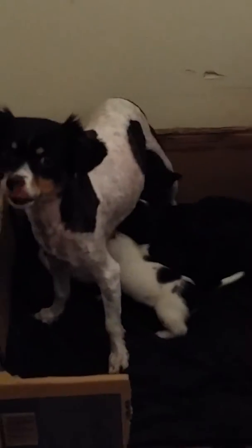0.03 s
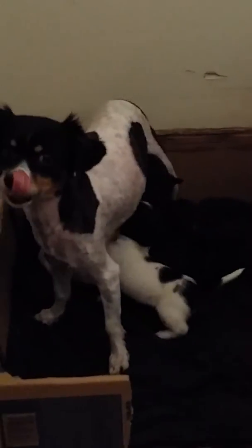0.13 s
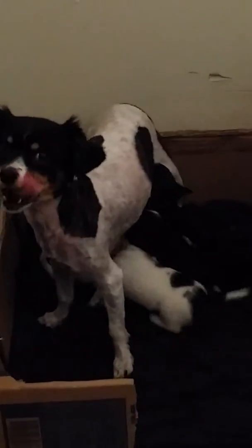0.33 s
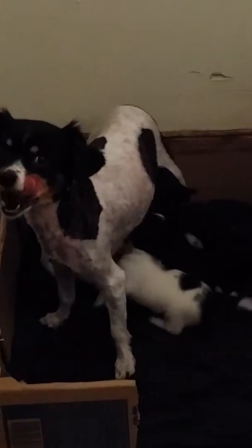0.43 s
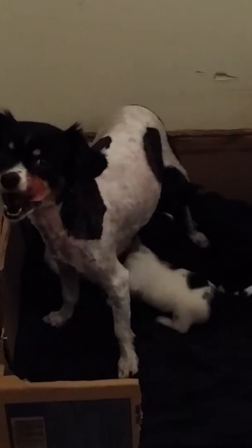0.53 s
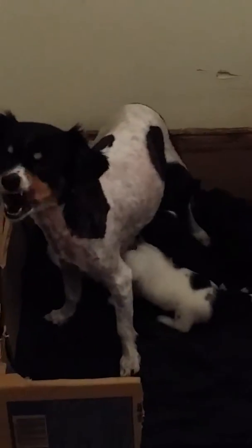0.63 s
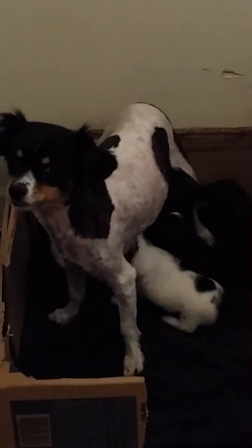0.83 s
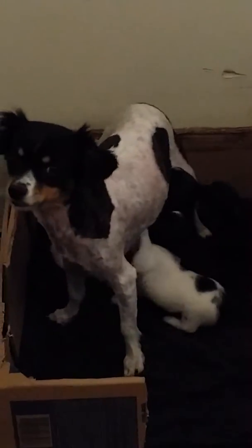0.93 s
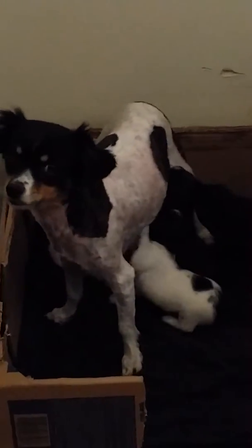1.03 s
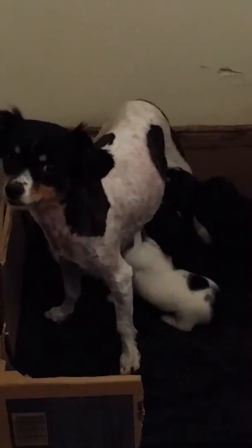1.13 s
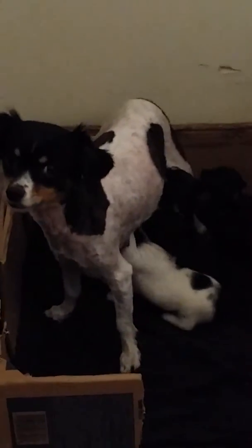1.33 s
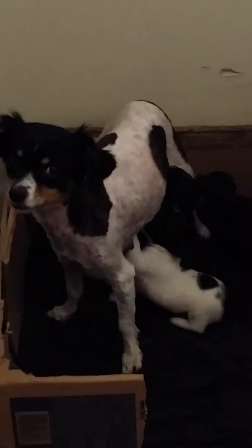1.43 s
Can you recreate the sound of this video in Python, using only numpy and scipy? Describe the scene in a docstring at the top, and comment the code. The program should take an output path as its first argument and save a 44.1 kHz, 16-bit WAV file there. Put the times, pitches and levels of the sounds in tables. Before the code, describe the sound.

A newborn puppy gives one thin, high squeal that holds its pitch, swells, then sags and turns rough. Soft bumps and a bright swish of bedding follow, heard close by in a small quiet room.

```python
"""A newborn puppy gives one thin, high squeal from its bedding in a small quiet room.
The note holds near one pitch, grows fuller as the mouth opens, then sags and turns rough.
The pup flops over with soft bumps and a bright swish of sliding cloth, then snuffles faintly.
The mother's licks tick now and then; a low rustle of bedding lies underneath."""
import sys
import numpy as np
from scipy import signal
from scipy.fft import rfft, irfft, next_fast_len
from scipy.io import wavfile

SR = 44100
rng = np.random.default_rng(int(sys.argv[2]) if len(sys.argv) > 2 else 0)


def file_out(sig):
    """Save sig as 16-bit WAV at sys.argv[1]."""
    # one column per channel
    cols = np.atleast_2d(sig).T
    # limit, then scale
    lim = np.clip(cols, -1, 1)
    pcm = np.round(lim * 32767).astype(np.int16)
    wavfile.write(sys.argv[1], SR, pcm)


N = 66150
T = np.arange(N) / SR
NEAR_PAN_DB, CUTOFF_HZ = -3, 14700

# (time [s], pitch [Hz])
SQUEAL_PITCH = [(.115, 969), (.15, 964), (.19, 963.6), (.225, 985.4), (.27, 980.7), (.32, 965), (.37, 980),
                (.45, 968.3), (.55, 969.5), (.62, 965.7), (.66, 956.4), (.69, 941), (.72, 930)]
# (time [s], level [dB])
SQUEAL_EFFORT = [(.115, -74), (.133, -48), (.185, -46), (.215, -38), (.25, -34), (.285, -36.5),
                 (.318, -34.5), (.35, -31.5), (.385, -36.5), (.43, -32), (.49, -32), (.545, -29),
                 (.605, -31), (.628, -29.5), (.646, -38), (.68, -34), (.705, -41), (.74, -76)]
# (time [s], rms jitter [fraction of pitch])
PITCH_JITTER = [(.12, 0.0027), (.3, 0.0042), (.45, 0.0012), (.62, 0.0011), (.66, .005), (.7, 0.03)]
# (time [s], opening [0 shut, 1 wide])
MOUTH_OPENING = [(.12, 0.8), (.25, 0.004), (.31, 0.26), (.37, 0.46), (.42, 0.59), (.48, 0.8), (.55, 0.91),
                 (.63, 0.9), (.7, 0.76)]
# (harmonic [number], level shut, ajar, half open, wide [dB], L-R shut, wide [dB])
MOUTH_HARMONICS = [(1, 1, -8.5, -4.5, -14.5, 4.5, -3.5), (2, 6, 0.5, 0.5, -5, -10.5, -12),
                   (3, -11.5, -11, -4.5, 3.5, -4.5, -7), (4, -22.5, -17.5, -15, -20.5, 0.5, -9.5),
                   (5, -31, -17.5, -22.5, -6.5, 4, 3), (6, -13.5, -22.5, -19.5, -39.5, 2, 5),
                   (7, -7.5, -6, -19.5, -17, 3, 5), (8, -7.5, -2.5, -10.5, -10.5, -3.5, -4.5),
                   (9, -14.5, -21.5, -17.5, -14, -7, -3.5)]
# (harmonic [number], level [dB])
TOP_HARMONICS = [(10, -28), (11, -29.5), (12, -37.5), (13, -31), (14, -29), (15, -41.5)]
# (time [s], level [dB])
BREATH_LEVEL = [(.11, -69), (.15, -49.5), (.22, -57.5), (.3, -48), (.43, -53.5), (.55, -56.5), (.63, -72),
                (.7, -50), (.74, -68)]
# (frequency [Hz], density [dB])
BREATH_SPECTRUM = [(200, -14), (600, -5.5), (1400, 0.5), (2500, -1.5), (3400, -5.5), (5500, -3.5),
                   (7500, 3), (10000, -7), (14500, -11)]


def squeal():
    """Harmonics of one jittery pitch plus leaking air; the opening mouth favours the third harmonic."""
    jitter_hz, rasp_hz, shimmer_hz, flutter_hz, fray_hz = 82, 300, 21, 16, 57.4
    left_lead_s, top_pan_db = .000035, -5
    jitter = along(PITCH_JITTER, T) * drift(jitter_hz)
    rasp = .0012 * drift(rasp_hz)
    pitch_hz = along(SQUEAL_PITCH, T) * (1 + jitter + rasp)
    phase = 2 * np.pi * (np.cumsum(pitch_hz) / SR + pitch_hz * left_lead_s * np.array([[1], [0]]))
    mouth = along(MOUTH_OPENING, T)
    partials = []
    for _, *levels_db, shut_pan_db, wide_pan_db in MOUTH_HARMONICS:
        level_db = np.interp(mouth, np.linspace(0, 1, len(levels_db)), levels_db)
        partials.append((level_db, shut_pan_db + (wide_pan_db - shut_pan_db) * mouth))
    partials += [(level_db, top_pan_db) for _, level_db in TOP_HARMONICS]
    voice, power = 0, 0
    for k, (level_db, pan_db) in enumerate(partials, 1):
        shimmer_db = (1.5 + 5.2 * (1 - mouth) * (k > 2)) * drift(shimmer_hz)
        flutter_db = 7.5 * k / len(partials) * drift(flutter_hz)
        voice += pan(pan_db) * from_db(level_db + shimmer_db + flutter_db) * np.sin(k * phase)
        power += from_db(level_db) ** 2 / 2
    # The voice frays as it gives out.
    fray_depth_db = np.interp(T, [.62, .68], [0, 3.5])
    fray_db = fray_depth_db * np.cos(2 * np.pi * fray_hz * (T - .68))
    tone = from_db(along(SQUEAL_EFFORT, T) + fray_db) * voice / np.sqrt(power)
    breath = pan(NEAR_PAN_DB) * from_db(along(BREATH_LEVEL, T)) * noise(BREATH_SPECTRUM)
    sounding = (T > SQUEAL_EFFORT[0][0]) * (T < SQUEAL_EFFORT[-1][0])
    return sounding * (tone + breath)


# (peak time [s], rise [s], fall [s], level [dB])
CLOTH_SLIDES = [(.15, .012, .04, -59), (0.774, 0.058, 0.054, -36.5), (1.012, 0.074, 0.055, -57.5),
                (1.141, 0.011, 0.0083, -61), (1.19, 0.022, 0.023, -65.5), (1.5, 0.045, .05, -62)]
# (frequency [Hz], density [dB])
CLOTH_SPECTRUM = [(200, -9), (700, -14), (1200, -18), (2300, -3.5), (3500, -8.5), (5200, -8), (7500, -1.5),
                  (11000, -3), (14500, -6)]


def cloth_swishes():
    """Fibres catch and slip under the pup, giving each slide a finely grained hiss."""
    grain = rms_one(from_db(1.5 * drift(rate_hz=190)))
    slides = sum(swell(*slide) for slide in CLOTH_SLIDES)
    return pan(db=-4) * slides * grain * noise(CLOTH_SPECTRUM)


# (time [s], thud level [dB], puff level [dB], thud frequency [Hz], thud T60 [s])
BODY_BUMPS = [(.077, -59, -51, 314, 0.093), (.111, -72, -48.5, 370, 0.034), (.185, -66, -76, 128, .12),
              (0.291, -48, -53, 226, 0.11), (.704, -44.5, -40, 257, 0.15), (.762, -51, -56, 222.3, 0.22),
              (0.814, -46.5, -50.5, 92.65, .2), (0.927, -58, -63, 242, 0.076),
              (1.119, -55.5, -87, 105, 0.091), (1.234, -63, -72, 113.1, 0.15), (1.413, -58, -75, 96.7, .3),
              (1.479, -65.5, -59, 275, 0.06)]


def bumps():
    """Paws and body hit the bedding: damped low thuds, each with a dull puff from the padding."""
    puff_band = signal.butter(2, [190, 515], "band", fs=SR, output="sos")
    puff_noise = rms_one(signal.sosfilt(puff_band, rng.standard_normal(N)))
    total = np.zeros(N)
    for start_s, thud_db, puff_db, thud_hz, t60_s in BODY_BUMPS:
        ring = np.sqrt(2) * np.sin(2 * np.pi * thud_hz * (T - start_s))
        total += from_db(thud_db) * strike(start_s, attack_s=.0061, t60_s=t60_s) * ring
        total += from_db(puff_db) * strike(start_s, attack_s=.0007, t60_s=.077) * puff_noise
    return total


# (time [s], level [dB])
LICK_TICKS = [(0.077, -53), (0.142, -41.5), (.926, -74), (1.122, -51.5)]
# (frequency [Hz], density [dB])
LICK_SPECTRUM = [(500, -8), (2000, -22), (4000, -3), (7500, 10), (13000, -3.5), (14500, -6)]


def licks():
    """The mother's licking makes short, wet ticks of bright noise."""
    ticks = sum(from_db(db) * strike(start_s, attack_s=.00062, t60_s=.048) for start_s, db in LICK_TICKS)
    return ticks * noise(LICK_SPECTRUM)


# (time [s], level [dB])
SHUFFLE_LEVEL = [(0, -58.5), (.06, -62.5), (.2, -57), (.3, -56.5), (.56, -53), (.65, -57), (.85, -59.5),
                 (1.0, -63), (1.15, -62.5), (1.27, -76.5), (1.5, -65)]
# (frequency [Hz], density [dB])
BEDDING_SPECTRUM = [(30, -16), (110, 0.5), (250, -3.5), (500, -8.5), (1000, -12.5), (3000, -13.5),
                    (8000, -15.5), (14500, -22.5)]


def shuffle():
    """The dogs shift on the bedding with an uneven low rustle."""
    flutter_db = 2 * drift(rate_hz=30)
    return from_db(along(SHUFFLE_LEVEL, T) + flutter_db) * noise(BEDDING_SPECTRUM)


def snuffle():
    """Air through the pup's nose gives a brief breathy whistle of narrow-band noise."""
    centre_hz, width_hz = 1680, 85
    phase = 2 * np.pi * centre_hz * T
    whistle = drift(width_hz) * np.sin(phase) + drift(width_hz) * np.cos(phase)
    return swell(peak_s=1.02, rise_s=.04, fall_s=.035, db=-67) * whistle


# One row per ear, left first: (delay of each wall path [s])
WALL_PATHS_S = [
    [.0171, .0223, .0269, .0317, .0373, .0431],
    [.0187, .0239, .0283, .0337, .0391, .0457],
]
# (all-pass delay [s])
SCATTER_LAGS_S = [.0013, .0029, .0047]


def room_reverb(x, t60_s=.31):
    """Sound circles between the walls on separate paths for each ear, scattering on the way."""
    size = next_fast_len(2 * N)
    phase_per_s = -2j * np.pi * np.fft.rfftfreq(size, 1 / SR)
    paths_s = np.array(WALL_PATHS_S)[..., None]
    round_trip = np.exp(phase_per_s * paths_s - np.log(1000) * paths_s / t60_s)
    tail = np.mean(round_trip / (1 - round_trip), axis=1)
    for lag_s in SCATTER_LAGS_S:
        delay = np.exp(phase_per_s * lag_s)
        tail *= (delay - .5) / (1 - .5 * delay)
    tail /= np.sqrt(np.mean(abs(tail) ** 2))
    return irfft(rfft(x, size) * tail, size)[:, :N]


# (frequency [Hz], density [dB])
ROOM_TONE_SPECTRUM = [(15, -29), (25, -3), (378, -14), (455, -12), (493, -31.5), (579, -6.5), (679, -19.5),
                      (862, -18.5), (1970, -23), (14500, -29)]


def room_tone():
    """Faint, steady noise, strongest in the bass."""
    return from_db(-71.5) * noise(ROOM_TONE_SPECTRUM)


# (frequency [Hz], left-right correlation [0 to 1])
EAR_CORRELATION = [(60, 1), (500, 0.26), (1500, 0), (4000, 0), (14000, 0.044)]


def noise(spectrum):
    """Coloured stereo noise at rms 1, alike in both ears in the bass."""
    hz = np.maximum(np.fft.rfftfreq(N, 1 / SR), 1)
    mid, side = rfft(rng.standard_normal((2, N)))
    correlation = at_hz(EAR_CORRELATION, hz)
    stereo = np.sqrt(1 + correlation) * mid + np.sqrt(1 - correlation) * side * [[1], [-1]]
    return rms_one(irfft(stereo * from_db(at_hz(spectrum, hz)) * (hz < CUTOFF_HZ), N))


def drift(rate_hz):
    """Smooth random motion at rms 1."""
    pole = np.exp(-2 * np.pi * rate_hz / SR)
    return rms_one(signal.lfilter([1], [1, -2 * pole, pole * pole], rng.standard_normal(2 * N))[N:])


def swell(peak_s, rise_s, fall_s, db):
    """Bell-shaped envelope."""
    return from_db(db) * np.exp(-((T - peak_s) / np.where(T < peak_s, rise_s, fall_s)) ** 2)


def strike(start_s, attack_s, t60_s):
    """Quick rise, exponential decay."""
    age_s = np.maximum(T - start_s, 0)
    return (1 - np.exp(-age_s / attack_s)) * np.exp(-np.log(1000) * age_s / t60_s)


def pan(db):
    """Equal-power gains for an L-R level difference."""
    gains = from_db(np.array([[.5], [-.5]]) * db)
    return gains / np.sqrt(np.mean(gains ** 2, axis=0))


def along(points, at):
    """Linear table lookup."""
    return np.interp(at, *np.transpose(points))


def at_hz(points, hz):
    """Log-frequency table lookup."""
    points_hz, values = np.transpose(points)
    return np.interp(np.log(hz), np.log(points_hz), values)


def from_db(db):
    """Decibels to gain."""
    return 10 ** (np.asarray(db) / 20)


def rms_one(x):
    """Scale to rms 1."""
    return x / np.sqrt(np.mean(x ** 2) + 1e-20)


def scene():
    """The squeal and its reverb, with small dry movements over the room tone."""
    voice, cloth = squeal(), cloth_swishes()
    near = bumps() + licks() + shuffle() + snuffle() + room_tone()
    return voice + from_db(-6) * room_reverb(voice) + cloth + pan(NEAR_PAN_DB) * near


def record(dry):
    """Steep low-pass on the top treble."""
    return signal.sosfilt(signal.ellip(12, .1, 80, CUTOFF_HZ, fs=SR, output="sos"), dry)


dry = scene()
out = record(dry)
file_out(out)
```